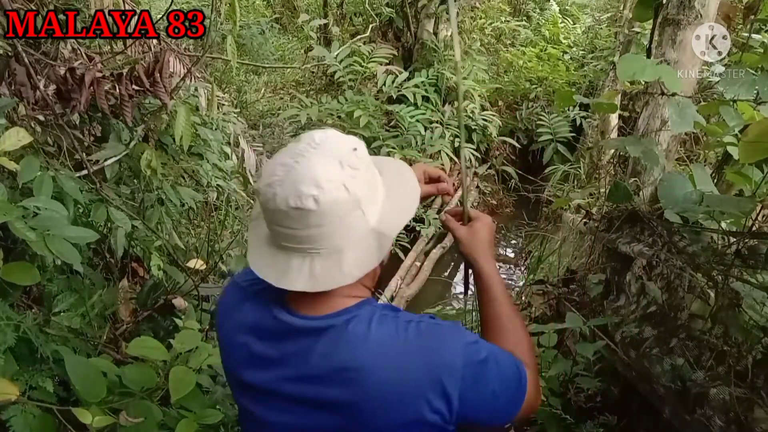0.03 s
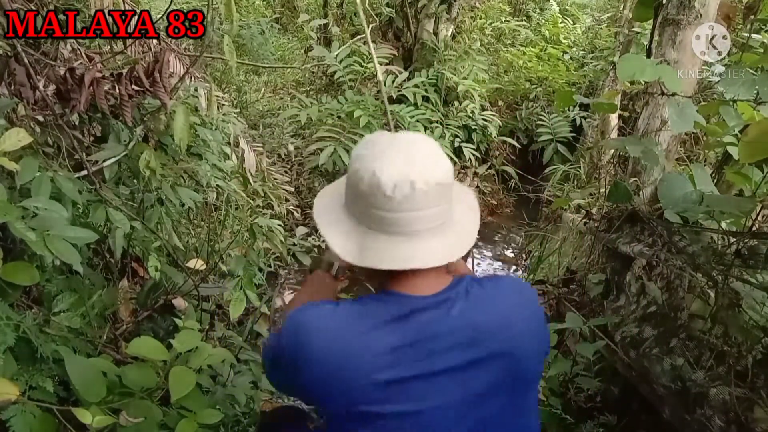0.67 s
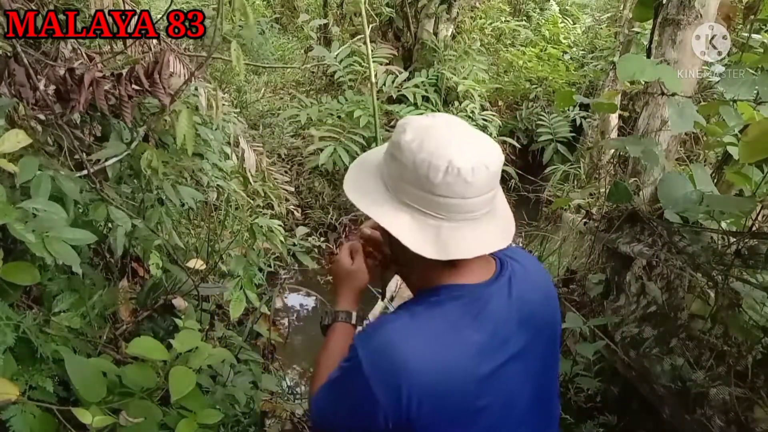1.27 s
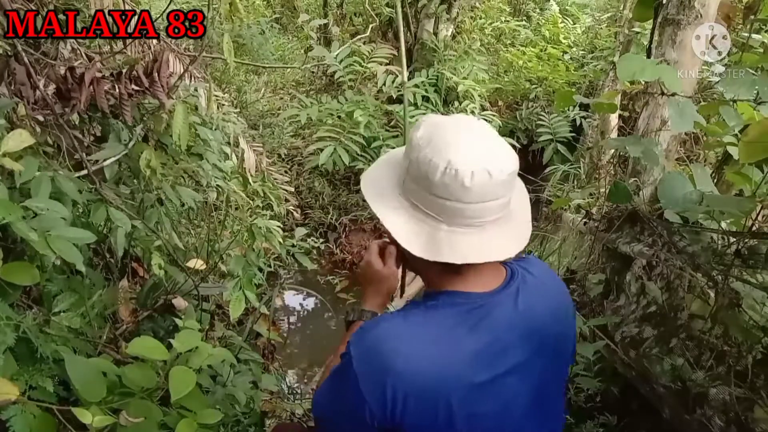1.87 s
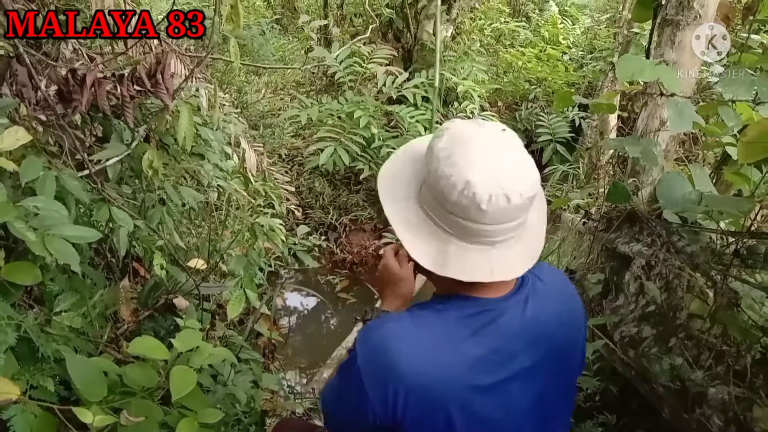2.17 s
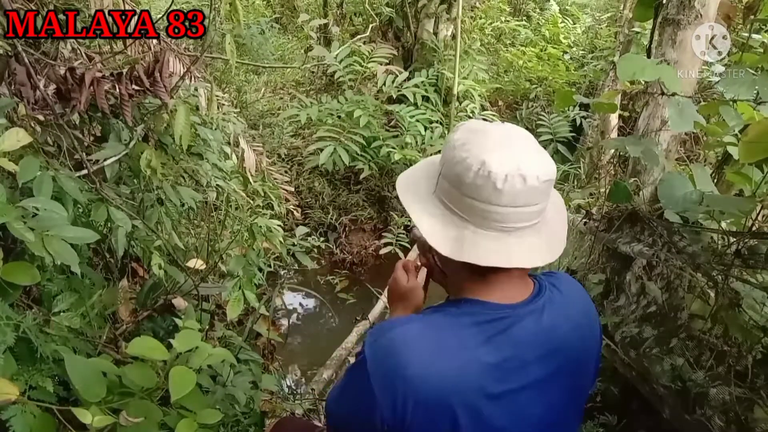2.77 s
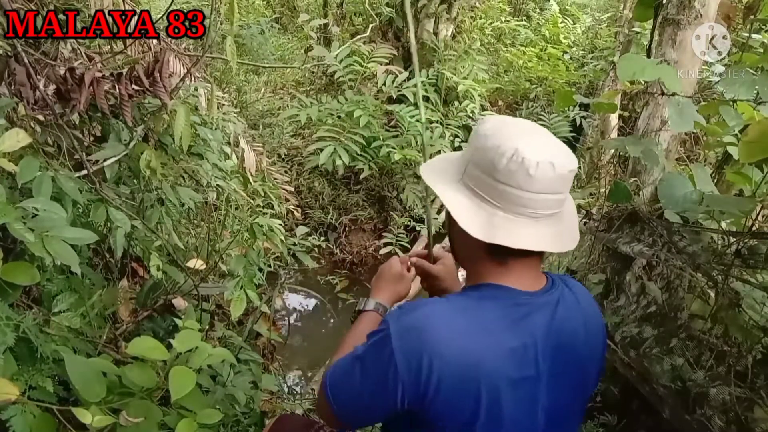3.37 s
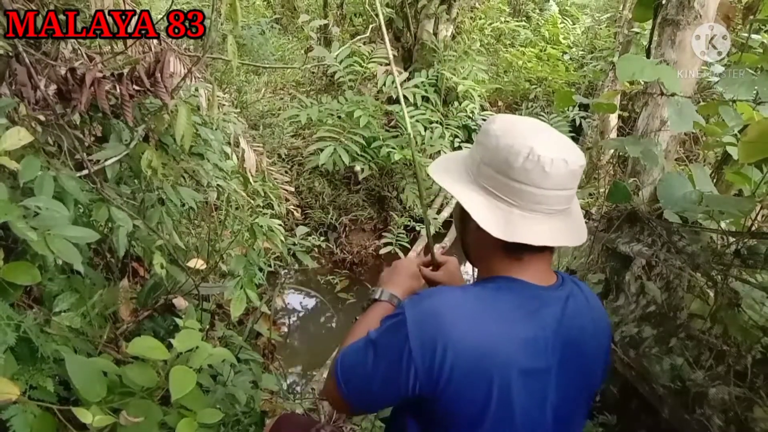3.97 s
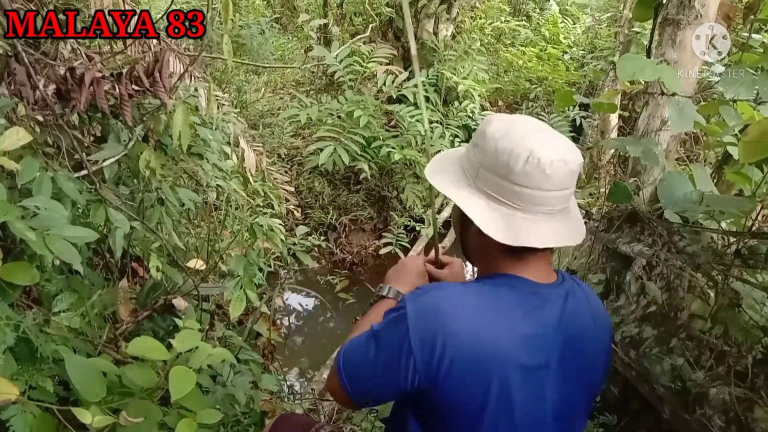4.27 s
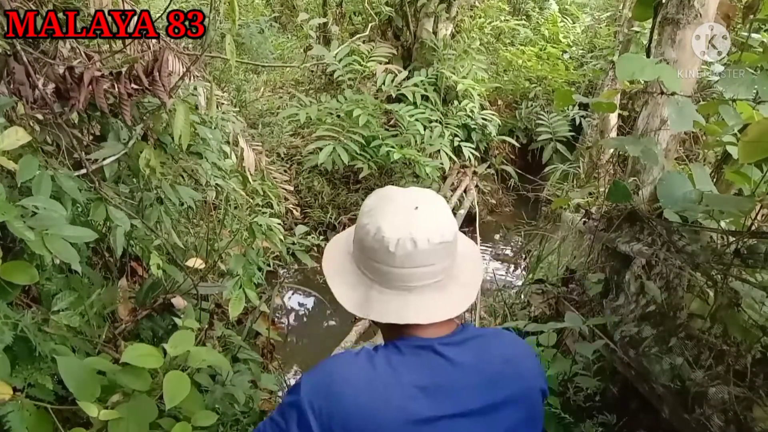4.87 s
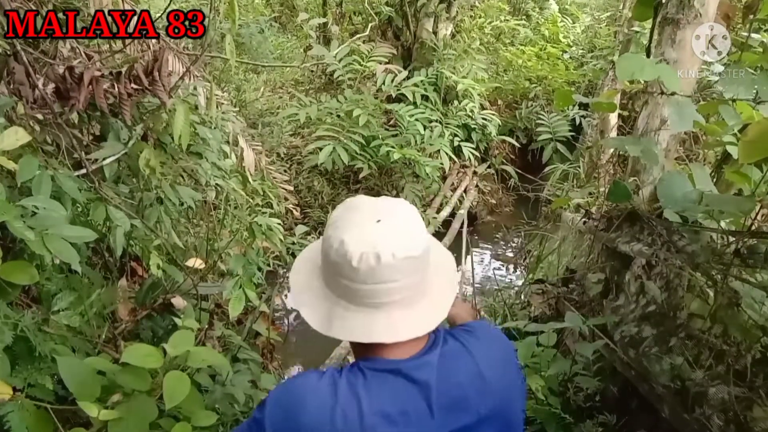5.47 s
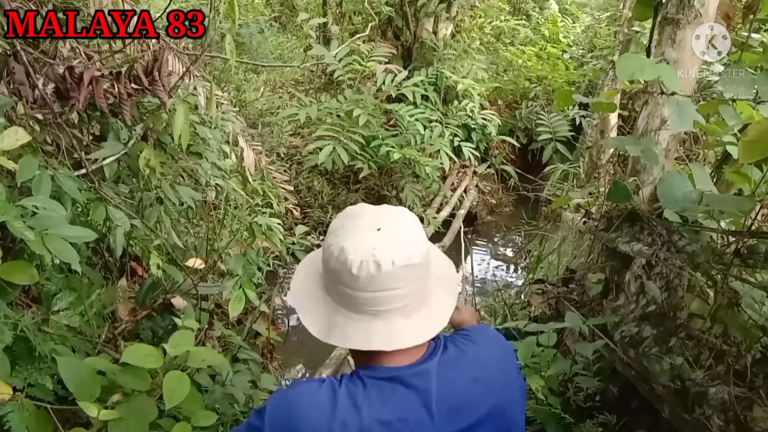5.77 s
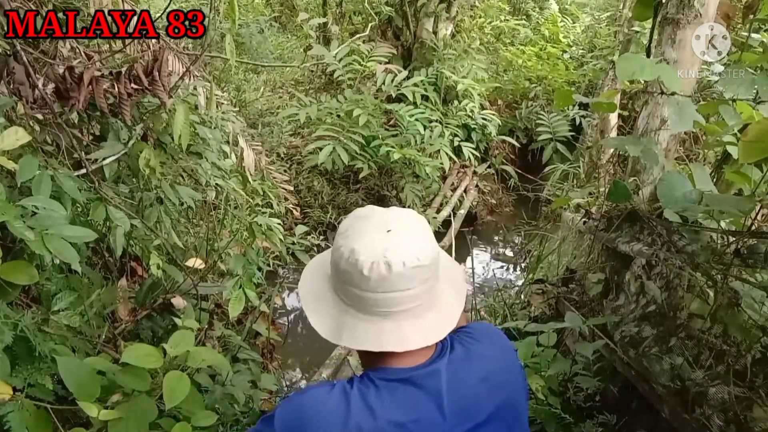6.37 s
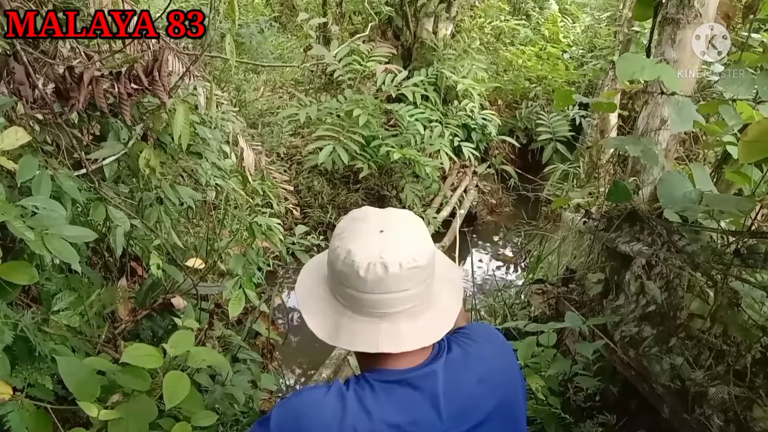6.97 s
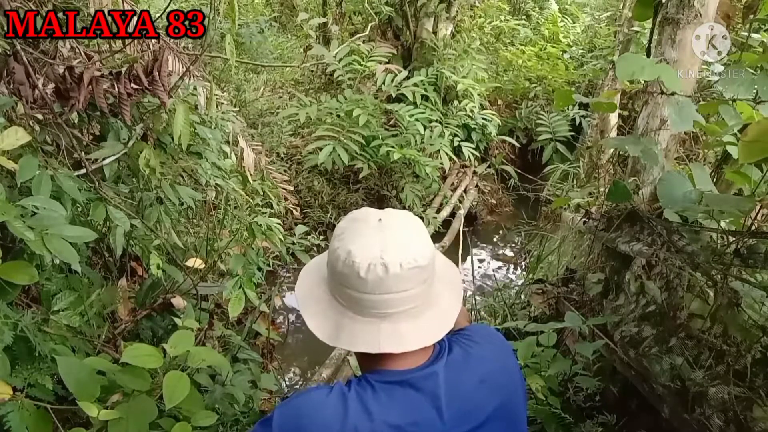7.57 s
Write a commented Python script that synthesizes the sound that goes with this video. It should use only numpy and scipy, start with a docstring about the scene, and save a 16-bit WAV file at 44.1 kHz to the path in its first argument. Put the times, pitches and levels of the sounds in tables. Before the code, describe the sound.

Water plops and trickles in a wooded brook under high trilling, whining insects, with nearby twig cracks and light leaf rustles.

```python
"""A small stream trickles over its bed in a forest: bubbles ring in clusters over a splashy wash.
Close by, handled twigs snap and leaves rustle. Crickets draw file over scraper, trilling in turns
near 6 kHz, and smaller ones answer near 8.5 kHz. A katydid rasps very high until it stops.
A far insect chorus and a few bird whistles sit behind. Two close microphone ports hear
the water out of step, which gives it width."""
import sys
import numpy as np
from scipy import signal
from scipy.fft import rfft, irfft, next_fast_len
from scipy.io import wavfile

SR = 44100
rng = np.random.default_rng(int(sys.argv[2]) if len(sys.argv) > 2 else 0)


def file_out(sig):
    """Save sig as 16-bit WAV at sys.argv[1]."""
    # one column per channel
    cols = np.atleast_2d(sig).T
    # limit, then scale
    lim = np.clip(cols, -1, 1)
    pcm = np.round(lim * 32767).astype(np.int16)
    wavfile.write(sys.argv[1], SR, pcm)


N = 340011
TIME = np.arange(N) / SR

# how far the left port leads on the water: freq_hz, lead_rad
WATER_LEAD = [(60, 1.85), (150, 1.35), (300, 1.1), (700, 0.72), (1100, 1.55), (1500, 1.87), (2100, 2.3),
              (3000, 3.7), (4800, 1.77), (9000, 0.24)]
# balance of small bubbles by size: pitch_hz, relative_db
BUBBLE_BALANCE = [(500, -60), (750, -47.5), (1150, -40), (1800, -34.5), (2600, -34.5), (3800, -40)]
# vigour of the trickle: time_s, relative_db
FLOW = [(0.0, -45), (1.7, -45.5), (2.21, -54), (2.77, -50), (3.03, -59), (4.04, -44), (4.27, -37),
        (4.72, -62), (5.3, -52), (5.71, -61), (6.27, -52), (6.66, -46), (7.09, -32), (7.71, -59)]
def trickle(per_s=140, gulps_per_s=160, gulp_s=.03, low_hz=680, high_hz=2700, ring_cycles=55,
            follows_flow=.22, gain_db=-2.5):
    """The bed swallows air in gulps, clusters of like-sized bubbles that grow louder with the flow."""
    out = np.zeros((2, N))
    pool, count = 4000, int(per_s * N / SR)
    gulps = rng.random((pool, 3))
    which, late, climb = rng.random((pool, 3))[:count].T
    loud, ring, aside, detune = np.clip(rng.standard_normal((pool, 4)), -2, 1.8)[:count].T
    when, size, force = gulps[(which * gulps_per_s * N / SR).astype(int)].T
    starts = when * N / SR - gulp_s * np.log(1 - late)
    pitches = low_hz * (high_hz / low_hz) ** size * 2 ** (.171 * detune)
    flow_db, = along(FLOW, starts)
    peaks_db = at_hz(BUBBLE_BALANCE, pitches) + gain_db + 1.3 * (2 * force - 1) + 2 * loud
    peaks_db += follows_flow * (flow_db - flow_db.mean())
    t60s = ring_cycles / pitches * np.exp(.61 * ring)
    leads = at_hz(WATER_LEAD, pitches) + .92 * aside
    for start, *bubble in zip(starts, pitches, peaks_db, t60s, leads, .28 * climb):
        if start < TIME[-1] - .01:
            add_ring(out, start, *bubble, swell_cycles=2)
    return out


# foreground plops: start_s, relative_db, pitch_hz, ring_cycles, rise_share
PLOPS = [(0.021, -28, 955, 26, .1), (0.077, -28, 1990, 49, .3), (0.135, -35, 2100, 50, .1),
         (0.236, -40, 1070, 60, 0.35), (0.305, -39, 1900, 50, .3), (0.365, -38.5, 1217, 210, 0.84),
         (0.499, -26, 1613, 61, 0.087), (0.546, -33.5, 1850, 62, .4), (0.584, -28.5, 1184, 60, .1),
         (0.607, -40, 2080, 50, .1), (0.672, -34, 1125, 76, 0.36), (0.72, -45, 1510, 60, .1),
         (0.913, -35, 2780, 50, .1), (0.955, -33.5, 1447, 45, 0.25), (1.172, -37, 1200, 170, 0.82),
         (1.325, -39, 2030, 60, .1), (1.345, -30.5, 1770, 69, .1), (1.44, -38, 1075, 85, 0.085),
         (1.6, -30.5, 2230, 80, .4), (1.683, -32, 1305, 70, .1), (1.777, -33.5, 735, 85, .1),
         (1.847, -33, 1600, 30, .1), (2.016, -28, 2230, 34, .1), (2.126, -35, 1075, 120, 1),
         (2.285, -33, 2100, 60, 0.36), (2.403, -34, 1004, 53, 0.27), (2.55, -33.5, 1270, 40, .1),
         (2.59, -34.5, 1190, 77, .7), (2.764, -34, 1730, 65, 0.33), (2.828, -31, 1168, 50, 0.3),
         (3.122, -45, 2620, 50, 0.27), (3.285, -32, 1900, 45, .3), (3.789, -32.5, 915, 19, 0.091),
         (3.839, -28.5, 1810, 74, 0.11), (4.02, -31.5, 1505, 50, .1), (4.083, -32, 1360, 53, .1),
         (4.292, -25, 1190, 52, 0.12), (4.436, -34, 671, 52, .1), (4.474, -27.5, 1303, 110, 1),
         (4.492, -28.5, 845, 58, .1), (4.622, -39.5, 670, 58, .3), (5.129, -32, 1157, 140, 0.087),
         (5.444, -27.5, 1225, 62, 0.11), (5.485, -38, 1077, 70, .1), (5.845, -32, 1530, 53, 0.28),
         (6.037, -35, 716, 34, .1), (6.057, -19.5, 1364, 22, 0.25), (6.105, -26, 993, 113, 0.083),
         (6.117, -25, 1290, 65, 0.66), (6.247, -29, 1520, 30, .1), (6.272, -29, 2150, 60, .1),
         (6.322, -22, 2010, 36, 0.27), (6.36, -34, 1146, 77, .1), (6.541, -33, 840, 72, .1),
         (6.574, -37, 1620, 49, 0.09), (6.649, -29, 1130, 30, 0.23), (6.911, -30.5, 1040, 43, .1),
         (7.03, -29.5, 986, 77, .1), (7.235, -40, 653, 45, .2), (7.276, -28, 1890, 31, .3),
         (7.461, -32, 707, 52, 0.12), (7.472, -25.5, 1450, 70, 0.09), (7.524, -37, 1440, 52, .1),
         (7.646, -34, 1630, 77, .1), (7.665, -31.5, 1213, 42, .1)]
def plops(gain_db=2, spray_s=.04, spray_octaves=.55, spray_db=-10):
    """Single bubbles ring close by, each throwing up three smaller, higher ones."""
    out = np.zeros((2, N))
    for start, db, hz, cycles, rise in PLOPS:
        add_ring(out, start, hz, db + gain_db, cycles / hz, at_hz(WATER_LEAD, hz), rise, 1.3)
        for late, higher, aside in rng.random((3, 3)):
            small_hz = hz * 2 ** (spray_octaves * higher)
            lead = at_hz(WATER_LEAD, small_hz) + .3 * (2 * aside - 1)
            add_ring(out, start + spray_s * late, small_hz, db + spray_db, cycles / small_hz, lead,
                     rise=.12, swell_cycles=1.3)
    return out


def gurgle(start_s=1.85, end_s=3.0, pitch_hz=788.3, peak_db=-45.5, count=16, spread_octaves=.049):
    """A pocket in the bed gurgles on one note: a run of large, nearly equal bubbles."""
    out = np.zeros((2, N))
    for k, (late, size) in enumerate(rng.random((count, 2))):
        start = start_s + (end_s - start_s) * (k + late) / count
        hz = pitch_hz * 2 ** (spread_octaves * (2 * size - 1))
        add_ring(out, start, hz, peak_db, t60=.13, lead=at_hz(WATER_LEAD, hz), rise=.05, swell_cycles=5)
    return out


# bright plinks: start_s, peak_db, pitch_hz, t60_s
DROPS = [(0.084, -23, 2780, 0.014), (.848, -29.5, 3995, .02), (1.01, -20, 4850, 0.013),
         (5.1637, -29, 4970, .012), (5.3491, -25, 4960, 0.011), (5.396, -28, 5000, .012),
         (5.637, -28, 3020, 0.032), (5.996, -32, 3485, 0.016), (6.51, -30, 3900, .01),
         (6.887, -24, 5040, 0.02), (7.335, -27.5, 2650, 0.027), (7.427, -28, 3040, .022),
         (7.613, -26.5, 2640, 0.013), (7.638, -22, 3430, 0.019)]
def drops():
    """A falling drop traps one small bubble, whose note bends quickly upward."""
    out = np.zeros((2, N))
    for start, peak_db, hz, t60 in DROPS:
        add_ring(out, start, hz, peak_db, t60, lead=2.37, rise=.7, swell_cycles=3)
    return out


def fine_bubbles(per_s=42, low_hz=3000, high_hz=5600, level_db=-39.5, spread_db=3, t60=.012):
    """Where the surface breaks, the tiniest bubbles tick softly."""
    out = np.zeros((2, N))
    for when, size, force, aside in rng.random((int(per_s * N / SR), 4)):
        hz = low_hz * (high_hz / low_hz) ** size
        peak_db = level_db + spread_db * (2 * force - 1)
        add_ring(out, when * (TIME[-1] - t60), hz, peak_db, t60, 6.4 * aside, rise=.2, swell_cycles=2)
    return out


# fizz of water breaking over a stone: freq_hz, density_db
SPLASH_COLOUR = [(400, -23), (1000, -2), (1900, 21), (3000, -1), (4800, 10), (7000, -47), (14000, -20)]
# how much water noise both ports share: freq_hz, power_share
WATER_SHARED = [(100, 0.71), (300, 0.45), (800, 0.46), (1400, 0.085), (2200, 0.44), (3800, 1), (5000, 0.96),
                (9000, 0.48)]
def splashes(plop_offset_db=-14, grain_db=4):
    """The surface breaks in short, fizzy splashes: one with every plop, more at random."""
    kicks = random_kicks(per_s=22, level_db=-48, spread_db=4)
    for start, db, *_ in PLOPS:
        kicks[int(start * SR)] += from_db(db + plop_offset_db)
    fizz = from_db(grain_db * drift(300)) * stereo_noise(SPLASH_COLOUR, WATER_SHARED, WATER_LEAD)
    return decay(kicks, t60=.022) * rms_one(fizz)


# the finest spray: freq_hz, density_db
SPATTER_COLOUR = [(1500, -10), (3200, -16), (5000, 10), (9000, 8.5), (12000, 9.5), (15500, -6)]
# dead centre, reaching both ports together: freq_hz, lead_rad
IN_STEP = [(1000, 0)]
def spatter():
    """Tiny droplets tick on leaves and stones."""
    kicks = random_kicks(per_s=60, level_db=-47.5, spread_db=6)
    return decay(kicks, t60=.027) * stereo_noise(SPATTER_COLOUR, [(1000, .84)], IN_STEP)


# soft bed of water: freq_hz, density_db
WASH_COLOUR = [(20, -15), (60, -13), (150, -9), (300, -3.5), (500, 0), (1000, 0.5), (2000, 1.5),
               (3000, 2.5), (3800, -6), (4600, -1.5), (6000, -4.5), (9500, -6), (12000, -9.5), (15500, -67)]
def wash(level_db=-41, flutter_db=1.2):
    """Water farther off blends into a gently fluttering hiss."""
    hiss = stereo_noise(WASH_COLOUR, WATER_SHARED, WATER_LEAD)
    return hiss * from_db(level_db + flutter_db * drift(14))


# dry twig snaps, and a few sharp, high-ringing drips late on: start_s, relative_db, pitch_hz, t60_s, lead_rad
SNAPS = [(.149, -20, 2840, .012, 3.1), (1.4415, -10, 7235, 0.019, 2.64), (3.416, -24.5, 4280, 0.014, 1.1),
         (3.603, -25, 3860, 0.029, 2.1), (4.433, -16.5, 5050, 0.015, 2.35), (5.261, -23, 4900, 0.015, 0.91),
         (5.348, -26, 10900, 0.014, 1), (5.358, -27, 12500, 0.029, 1), (5.368, -26, 9200, .02, 1.1),
         (4.8707, -30, 11500, .008, 1), (5.2169, -32, 11000, .012, 1.1), (5.9702, -35, 11000, .012, 1),
         (5.992, -32, 10500, .015, 1.1), (7.4568, -36, 10500, .02, 1), (5.41, -28, 12500, .014, 1),
         (5.7073, -24, 10000, 0.021, 1.4), (6.0825, -32, 10850, 0.013, .5),
         (6.2391, -15, 3840, 0.011, 2.66), (6.239, -17, 8800, 0.0074, 2.8),
         (6.2472, -16, 1800, 0.0052, 2.4), (6.3164, -30, 11300, 0.015, .5),
         (6.371, -21, 10900, 0.0078, 3.3), (6.6995, -31, 10100, 0.006, .6), (6.9679, -29, 9200, .006, 1),
         (7.0928, -21.5, 5000, 0.011, 2), (7.0947, -9.5, 7050, 0.034, 2.68), (7.3007, -27, 9700, .007, 2.1),
         (7.3513, -7.5, 7100, 0.03, 2.75), (7.353, -16, 8500, .006, 2.3), (7.4728, -20, 2780, 0.0071, 2.2),
         (7.554, -15, 8600, 0.0037, 1.2), (7.6385, -17, 3740, 0.0046, .5)]
def snaps(width_hz=1500, crack_db=-13, grain_db=4, swell_share=.13, gain_db=.5):
    """Fibres break in a quick run: a broad crack that sets the twig ringing. The late high drips are voiced the
    same way, a crack and a short ring."""
    out, t = np.zeros((2, N)), TIME[:SR // 12]
    for start, db, hz, t60, lead in SNAPS:
        push, size = rng.standard_normal((2, len(t)))
        attack = (1 - np.exp(-t / (swell_share * t60))) ** 2
        fibres = push * attack * from_db(grain_db * np.clip(size, -2, 2) - 60 * t / t60)
        crack = from_db(crack_db) * resonate(fibres, 5000, 7400)
        twig = signal.hilbert(resonate_twice(fibres, hz, width_hz) + crack)
        stereo = np.real(twig * np.exp(.5j * lead * np.array([[1], [-1]]))) / np.abs(twig).max()
        first = int(start * SR)
        out[:, first:first + len(t)] += from_db(db + gain_db) * stereo[:, :N - first]
    return out


# stems and leaves brush: centre_s, half_length_s, relative_db
RUSTLES = [(0.763, 0.038, -46), (1.13, 0.068, -50), (1.377, 0.047, -53), (3.327, 0.02, -53),
           (3.438, 0.011, -48), (3.627, 0.03, -45), (4.452, 0.033, -57), (4.685, 0.14, -53),
           (4.859, 0.011, -48), (4.935, 0.021, -40), (5.118, 0.047, -50), (5.993, 0.038, -54),
           (6.241, 0.0059, -43), (6.527, 0.0099, -52), (7.237, 0.013, -43), (7.46, 0.031, -42)]
# crisp leaf tone: freq_hz, density_db
LEAF_COLOUR = [(300, -24), (1500, 16.5), (3000, 25.5), (4200, 21), (6000, 7), (8000, 7), (11500, 17),
               (14500, 9), (15500, -21)]
def rustle(grain_db=5, idle_db=-56, gain_db=-1):
    """Leaves slide over each other in clumps of tiny clicks."""
    brushes = sum(from_db(db + gain_db) * np.exp(-((TIME - s) / half) ** 2) for s, half, db in RUSTLES)
    clumps = from_db(grain_db * np.clip(drift(120), -2.5, 2.5))
    leaves = rms_one(clumps * stereo_noise(LEAF_COLOUR, [(1000, .99)], IN_STEP))
    return (from_db(idle_db) + brushes) * leaves


# soft low bumps: start_s, relative_db
BUMPS = [(.148, -45), (3.483, -46), (3.533, -39), (3.591, -40), (3.678, -43), (3.794, -44), (3.834, -48)]
def bumps(pitch_hz=140, gain_db=7):
    """Dull, short thumps reach the two ports nearly in opposite phase."""
    out = np.zeros((2, N))
    for start, db in BUMPS:
        add_ring(out, start, pitch_hz, db + gain_db, t60=.023, lead=2.68, rise=0, swell_cycles=.18)
    return out


# one wing stroke: cycle_share, relative_amplitude, bend_percent
WING_STROKE = [(0, 0.023, -3.5), (.24, 0.13, 1.5), (.32, 0.83, -0.7), (.47, 0.73, 1.0), (.66, 0.73, -0.5),
               (.78, 0.21, -5.5), (1, 0.038, -4)]
def trill(strokes, hz, waver=.00354, uneven_db=1):
    """Each wing stroke draws a file over a scraper: a nearly pure tone that sags as the stroke ends."""
    envelope, bend = along(WING_STROKE, strokes % 1)
    tone = sine(hz * (1 + bend / 100 + waver * drift(200)))
    return rms_one(envelope * tone) * from_db(uneven_db * drift(31))


# the nearest cricket's pace: time_s, strokes_per_s
NEAR_PACE = [(4.56, 50), (4.68, 50), (4.7, 73), (4.78, 83), (5.05, 82), (5.16, 70), (5.19, 46), (5.6, 44.3),
             (5.925, 40)]
# its tone rises with its effort: time_s, pitch_hz, level_db
NEAR_EFFORT = [(4.56, 5960, -37.5), (4.71, 6050, -36), (4.75, 6090, -33.5), (5.15, 6196, -31.5),
               (5.28, 6230, -30.3), (5.75, 6205, -30), (5.92, 6190, -29)]
def near_cricket():
    """The loudest singer, close to the microphone, starts at once, races, then settles."""
    start, end = NEAR_PACE[0][0], NEAR_PACE[-1][0]
    strokes = np.cumsum(along(NEAR_PACE, TIME)[0]) / SR
    hz, level_db = along(NEAR_EFFORT, TIME)
    song = trill(strokes - np.interp(start, TIME, strokes), hz)
    return from_db(level_db) * song * gate(start, end, fade_s=.004)


# cricket songs: start_s, end_s, pitch_hz, strokes_per_s, level_db, warm_up_s
SONGS = [(-.3, 1.84, 6060, 40.4, -37.5, .1), (0.042, 1.25, 6250, 52, -39.5, 0.037),
         (2.749, 3.8, 5830, 43, -48, .1), (3.6, 5, 5950, 51, -43.5, .1), (6.801, 8.2, 6260, 38, -47, 0.05),
         (7.518, 7.8, 6320, 42, -42.5, .02)]
def cricket(start, end, pitch_hz, strokes_per_s, level_db, warm_up_s, tiring_s=.28):
    """One song starts flat and soft, warms up and holds, then slows and sags as the singer tires."""
    cold = np.exp(-np.maximum(TIME - start, 0) / warm_up_s)
    tired = np.exp(-np.maximum(end - TIME, 0) / tiring_s)
    strokes = np.cumsum(strokes_per_s * (1 - .14 * tired)) / SR
    song = trill(strokes - np.interp(end, TIME, strokes), pitch_hz * (1 - .03 * cold - .007 * tired))
    return song * gate(start, end, fade_s=.008) * from_db(level_db - 2 * cold)


# three scrapes per chirp cycle: centre_share, half_length_share, relative_db
SCRAPES = [(.14, .075, -3), (.4, .085, 0), (.66, .1, -.5)]
# wing resonances: pitch_hz, width_hz, relative_db
WING_MODES = [(12500, 90, -19), (13680, 130, -12), (14000, 70, -12), (14240, 70, -11), (14480, 70, -14),
              (14880, 100, 0), (15260, 70, 2), (15410, 80, -3)]
def katydid(brisk_per_s=20.45, settled_per_s=19.17, settles_s=.89, end_s=4.55, teeth_per_s=2200,
            between_db=-11, rasp_db=-32, level_db=-36):
    """File teeth click unevenly and set the wing ringing; the chirps start brisk, settle, then stop."""
    cycle = np.cumsum(np.where(TIME < settles_s, brisk_per_s, settled_per_s)) / SR % 1
    scrapes = sum(from_db(db) * np.exp(-((cycle - at) / half) ** 4) for at, half, db in SCRAPES)
    teeth_passed = np.floor(np.cumsum(teeth_per_s * np.exp(.17 * drift(480))) / SR)
    uneven = from_db(2 * rng.standard_normal(N) + 1.2 * drift(23))
    clicks = np.diff(teeth_passed, prepend=0) * (from_db(between_db) + scrapes) * uneven
    wing = sum((-1) ** k * from_db(db) * resonate(clicks, hz, width)
               for k, (hz, width, db) in enumerate(WING_MODES))
    rasp = from_db(rasp_db) * resonate_twice(clicks, 12000, 5000)
    return rms_one(wing + rasp) * from_db(level_db) * gate(0, end_s, fade_s=.012)


# looping phrases: start_s, repeat_s, length_s, pitch_hz, relative_db
SMALL_CRICKETS = [(-.15, 1.37, .85, 8280, -51), (.55, 1.46, .7, 8590, -54), (.8, 1.64, .55, 8460, -51)]
def small_crickets(strokes_per_s=57, waver=.00303, wander=.0015, fade_s=.16, gain_db=-2):
    """Small singers overlap in short, quickly pulsed phrases, each repeating in its own time."""
    out = np.zeros(N)
    for start, repeat_s, length_s, hz, db in SMALL_CRICKETS:
        age = (TIME - start) % repeat_s
        phrase = np.clip(np.minimum(age, length_s - age) / fade_s, 0, 1)
        strokes = .5 + .5 * np.sin(2 * np.pi * strokes_per_s * age)
        tone = sine(hz * (1 + waver * drift(112) + wander * drift(2.02)))
        out += from_db(db + gain_db) * rms_one(strokes * tone) * phrase
    return out


# shimmer of far insects: freq_hz, density_db
CHORUS_COLOUR = [(3800, -20), (4900, -8.5), (5300, -0.5), (5850, 9), (6350, 6.5), (6900, 8), (7700, 4.5),
                 (8100, -1), (8600, 5), (9200, -43), (11000, -9.5)]
# its fader ride: time_s, relative_db
CHORUS_LEVEL = [(0.0, -41), (4.53, -41.5), (4.565, -46), (5.71, -44), (6.03, -48.5), (6.59, -47.5),
                (7.11, -46.5), (7.71, -48)]
def insect_chorus(gain_db=4):
    """Countless far insects merge into a high hiss near the centre."""
    db, = along(CHORUS_LEVEL, TIME)
    return from_db(db + gain_db) * stereo_noise(CHORUS_COLOUR, [(5800, 1), (7200, .96)], IN_STEP)


# thin, steady notes: pitch_hz, width_hz, level_db
FAR_NOTES = [(4966, 84, -62), (6850, 110, -52)]
def far_crickets():
    """Far tree crickets of each kind blur into one narrow band."""
    return sum(from_db(db) * rms_one(resonate_twice(rng.standard_normal(N), hz, width))
               for hz, width, db in FAR_NOTES)


# faint calls: start_s, end_s, pitch_hz, level_db
BIRD_NOTES = [(3.54, 3.64, 3850, -51), (5.52, 5.55, 3560, -48), (5.565, 5.62, 3580, -51),
              (5.633, 5.68, 3580, -45)]
def far_bird(waver=.0235, rough_db=4):
    """A far bird gives brief whistles, hoarse with fast flutter in pitch and level."""
    out = np.zeros(N)
    for start, end, hz, level_db in BIRD_NOTES:
        tone = sine(hz * (1 + waver * drift(164)))
        out += from_db(level_db + rough_db * drift(82)) * tone * gate(start, end, fade_s=.012)
    return out


def scatter(x, t60, delay_s):
    """Banks, trunks and leaves return a short spray of echoes, different at each port."""
    t = TIME[:SR // 2]
    echoes = rng.standard_normal((2, len(t))) * from_db(-60 * t / t60) * (t > delay_s)
    echoes /= np.sqrt(np.sum(echoes ** 2, axis=1, keepdims=True))
    return signal.fftconvolve(np.atleast_2d(x), echoes, axes=1)[:, :N]


def add_ring(out, start, hz, peak_db, t60, lead, rise, swell_cycles):
    """Mix in a note that swells and rings out; rise lifts its pitch, like a bubble surfacing."""
    first = int(np.clip(start * SR, 0, N - 2))
    t60 = max(t60, .002)
    t = TIME[:min(int(t60 * SR), N - first)]
    envelope = (1 - np.exp(-t * hz / swell_cycles)) ** 2 * from_db(-60 * t / t60)
    phase = 2 * np.pi * np.cumsum(hz * (1 + rise * (t / t60 - .15))) / SR
    stereo = np.sin(phase + lead * np.array([[.5], [-.5]]))
    out[:, first:first + len(t)] += from_db(peak_db) * envelope / envelope.max() * stereo


def stereo_noise(colour, shared, lead):
    """Coloured noise of unit power; both ports share a part, with the left ahead by lead."""
    size = next_fast_len(N)
    hz = np.arange(size // 2 + 1) * SR / size
    white = rfft(rng.standard_normal((3, size)))
    share = np.clip(at_hz(shared, hz), 0, 1)
    common = white[2] * np.exp(.5j * at_hz(lead, hz) * [[1], [-1]])
    blend = np.sqrt(share) * common + np.sqrt(1 - share) * white[:2]
    return rms_one(irfft(blend * from_db(at_hz(colour, hz)), size)[:, :N])


def random_kicks(per_s, level_db, spread_db):
    """Impulses of random timing and strength."""
    hits = rng.random(N) < per_s / SR
    return hits * from_db(level_db + spread_db * np.clip(rng.standard_normal(N), -2, 2))


def decay(kicks, t60):
    """Give every impulse an exponential tail."""
    return signal.lfilter([1], [1, -from_db(-60 / (t60 * SR))], kicks + 1e-18)


def resonate(x, hz, width_hz):
    """A resonance with gain 1 at its peak."""
    r = np.exp(-np.pi * width_hz / SR)
    poles = [1, -2 * r * np.cos(2 * np.pi * hz / SR), r * r]
    return signal.lfilter(np.array([1, 0, -1]) * (1 - r * r) / 2, poles, x)


def resonate_twice(x, hz, width_hz):
    """Two resonances in series, for steeper skirts."""
    return resonate(resonate(x, hz, width_hz), hz, width_hz)


def drift(rate_hz, step=40):
    """Smooth random modulation of unit power."""
    r = np.exp(-2 * np.pi * rate_hz * step / SR)
    slow = signal.lfilter([1], [1, -2 * r, r * r], rng.standard_normal(N // step + 2002))[2000:]
    return np.interp(np.arange(N) / step, np.arange(len(slow)), rms_one(slow))


def sine(hz):
    """A tone that follows a pitch curve."""
    return np.sin(2 * np.pi * np.cumsum(hz) / SR)


def gate(start, end, fade_s):
    """Open between two times, with sloping edges."""
    return np.clip(np.minimum(TIME - start, end - TIME) / fade_s + .5, 0, 1)


def along(rows, where):
    """Read a table's other columns along its first."""
    first, *columns = np.transpose(rows)
    return [np.interp(where, first, column) for column in columns]


def at_hz(points, hz):
    """Read a table on a log-frequency axis."""
    freqs, values = np.transpose(points)
    return np.interp(np.log(np.maximum(hz, 1)), np.log(freqs), values)


def from_db(db):
    """Decibels to gain."""
    return 10 ** (np.asarray(db) / 20)


def rms_one(x):
    """Scale to unit power."""
    return x / np.sqrt(np.mean(x ** 2) + 1e-20)


def scene():
    """Water below, leaves and twigs close by, insects all round, the forest scattering them."""
    bubbles = plops() + trickle() + gurgle() + drops() + fine_bubbles()
    bubbles = bubbles + from_db(-5) * scatter(bubbles, t60=.07, delay_s=.002)
    twigs = snaps()
    twigs = twigs + from_db(-14) * scatter(twigs, t60=.05, delay_s=.002)
    backdrop = wash() + insect_chorus()
    crickets = near_cricket() + sum(cricket(*song) for song in SONGS)
    crickets = crickets + from_db(-26) * scatter(crickets, t60=.08, delay_s=.002)
    answers = small_crickets()
    answers = answers + from_db(1) * scatter(answers, t60=.5, delay_s=.0022)
    water = bubbles + splashes() + spatter()
    handling = twigs + rustle() + bumps()
    wildlife = crickets + answers + far_crickets() + katydid() + far_bird()
    return water + handling + wildlife + backdrop


def record(dry, cutoff_hz=15600):
    """A steep low-pass takes off the very top."""
    return signal.sosfilt(signal.ellip(12, .1, 90, cutoff_hz, fs=SR, output="sos"), dry)


dry = scene()
out = record(dry)
file_out(out)
```